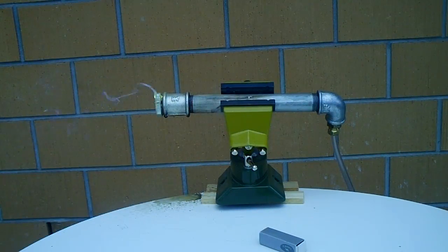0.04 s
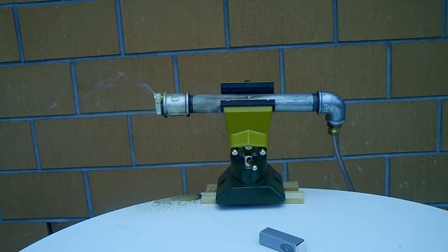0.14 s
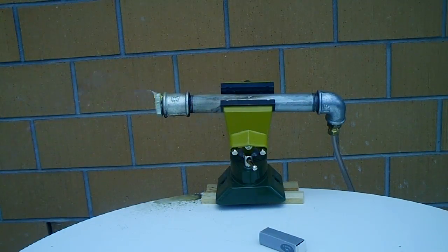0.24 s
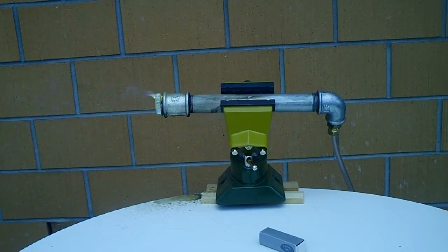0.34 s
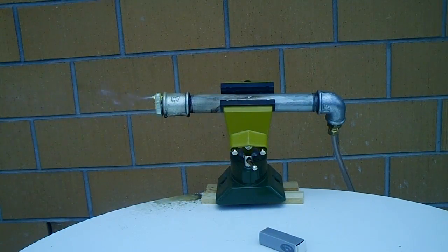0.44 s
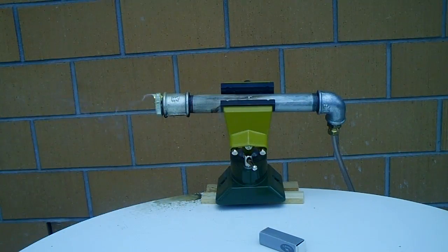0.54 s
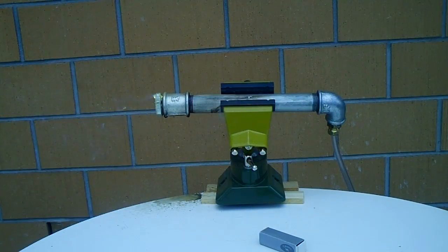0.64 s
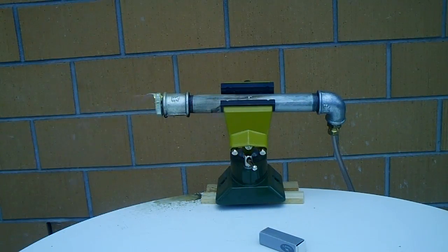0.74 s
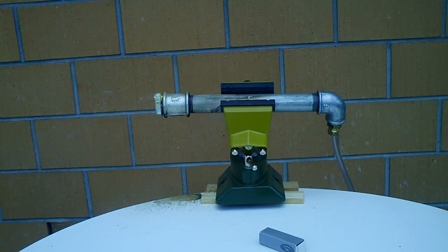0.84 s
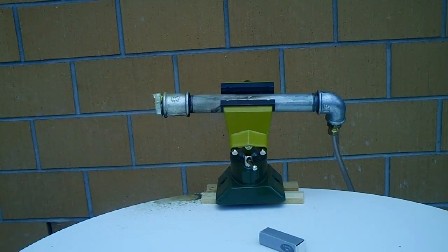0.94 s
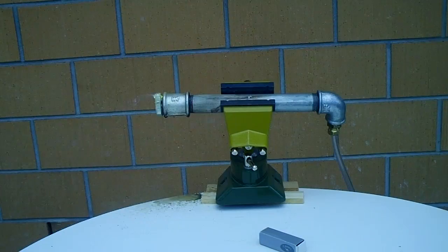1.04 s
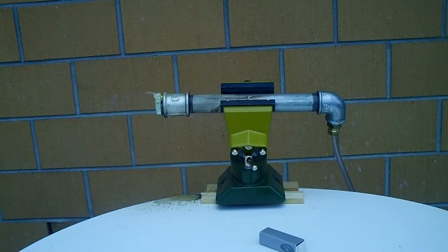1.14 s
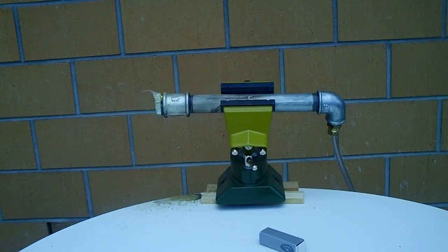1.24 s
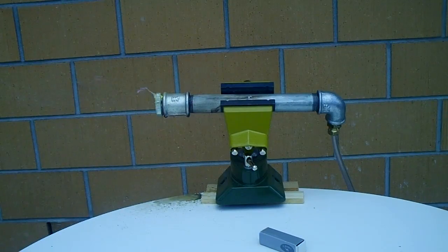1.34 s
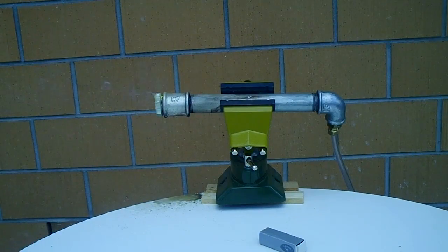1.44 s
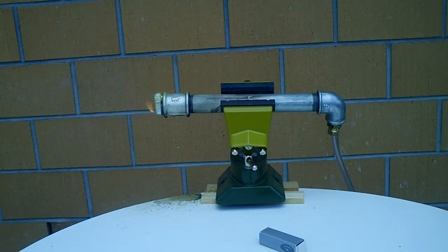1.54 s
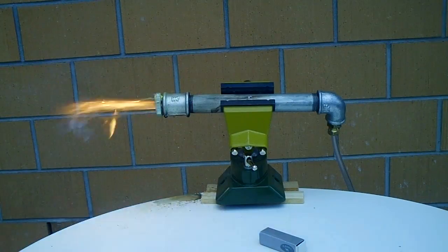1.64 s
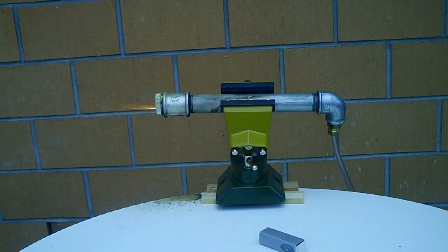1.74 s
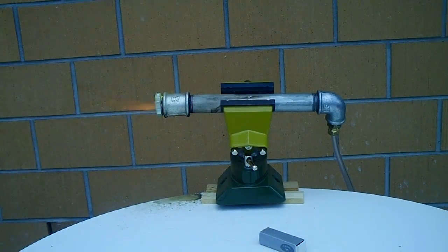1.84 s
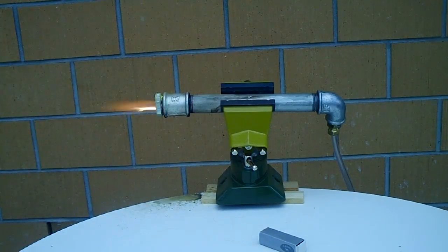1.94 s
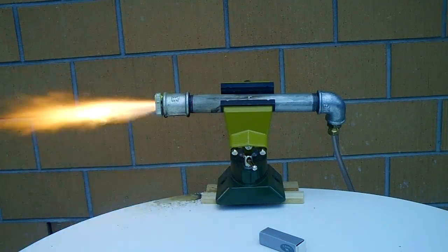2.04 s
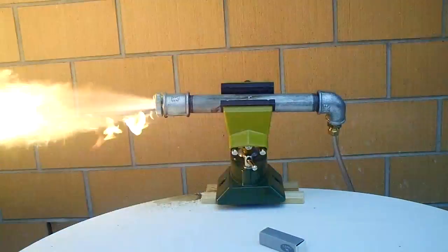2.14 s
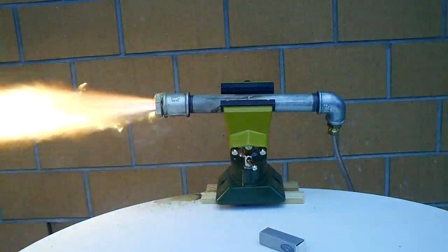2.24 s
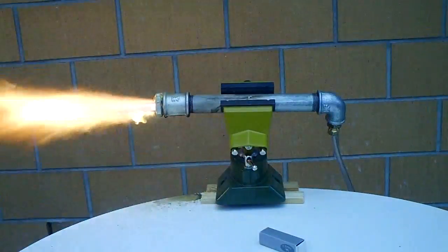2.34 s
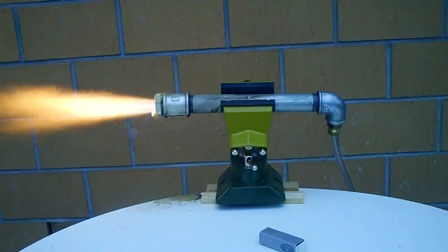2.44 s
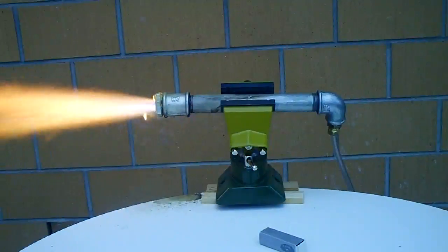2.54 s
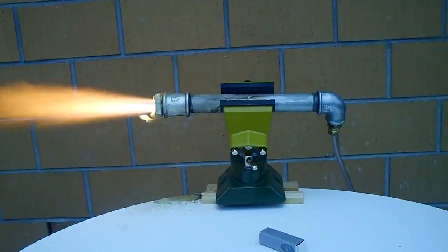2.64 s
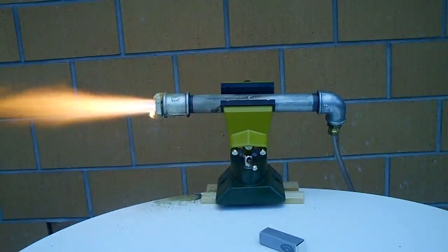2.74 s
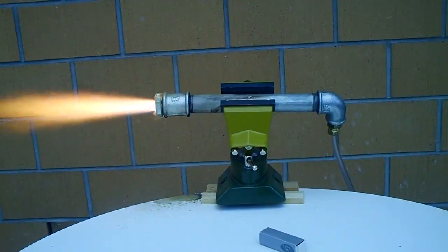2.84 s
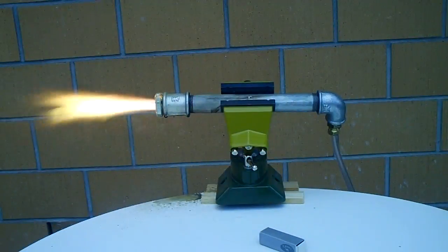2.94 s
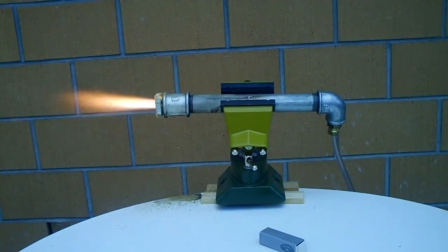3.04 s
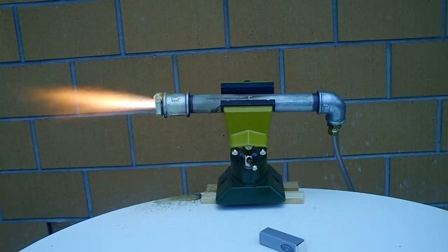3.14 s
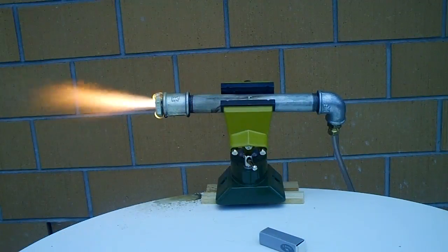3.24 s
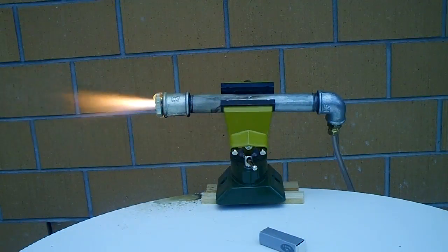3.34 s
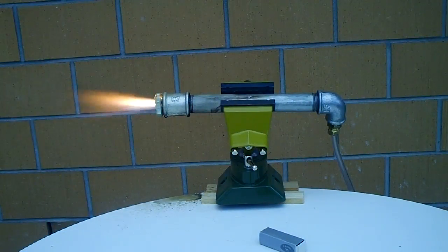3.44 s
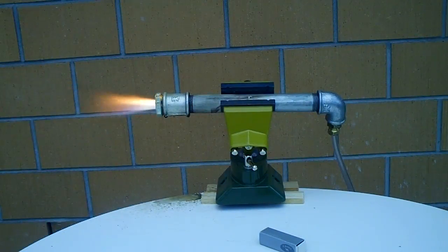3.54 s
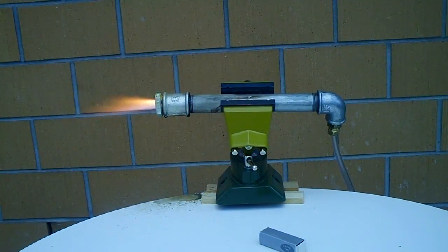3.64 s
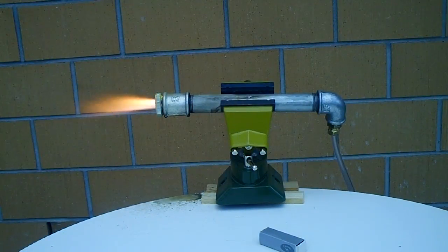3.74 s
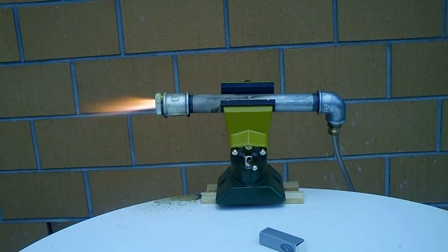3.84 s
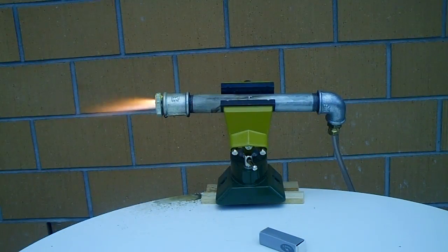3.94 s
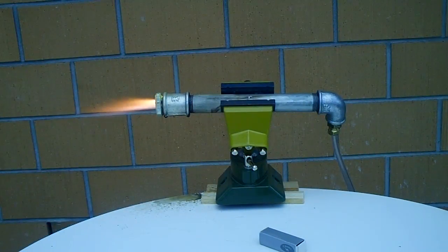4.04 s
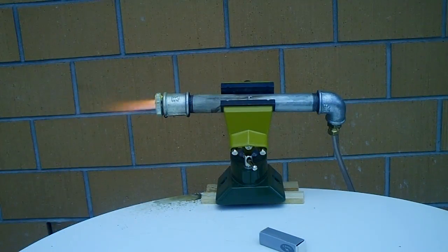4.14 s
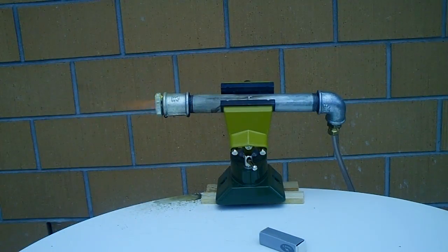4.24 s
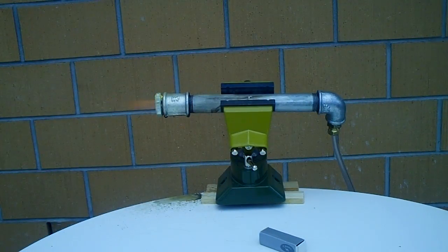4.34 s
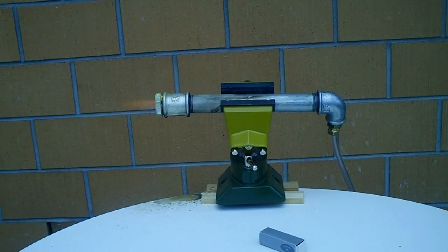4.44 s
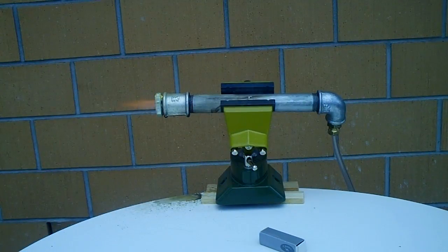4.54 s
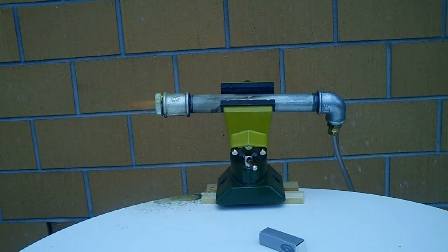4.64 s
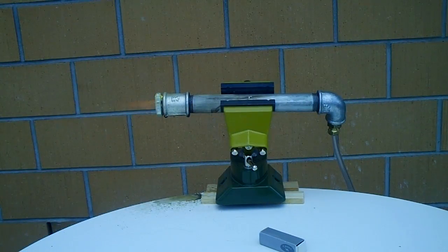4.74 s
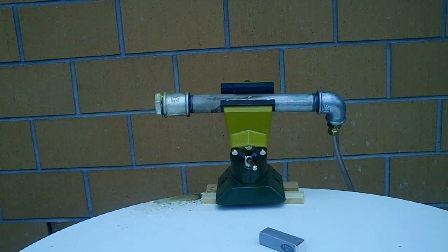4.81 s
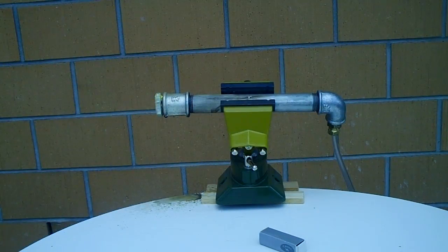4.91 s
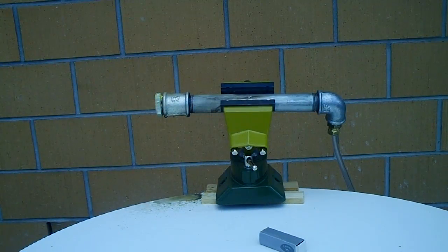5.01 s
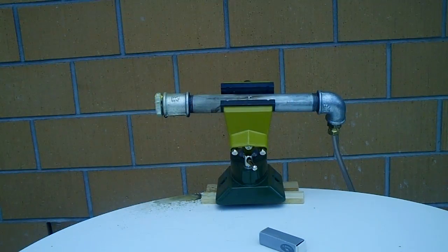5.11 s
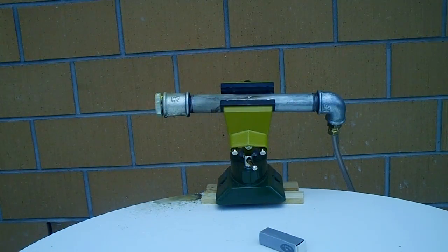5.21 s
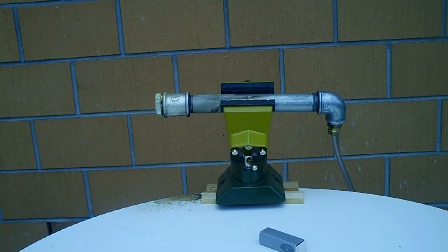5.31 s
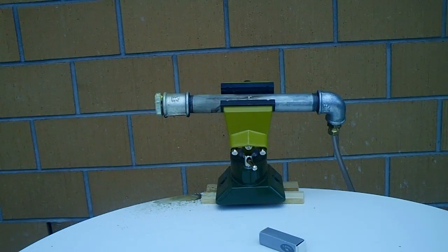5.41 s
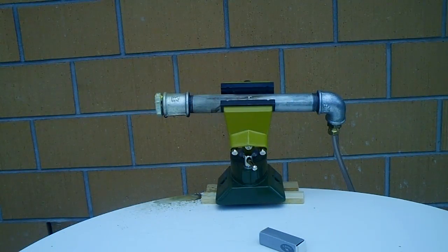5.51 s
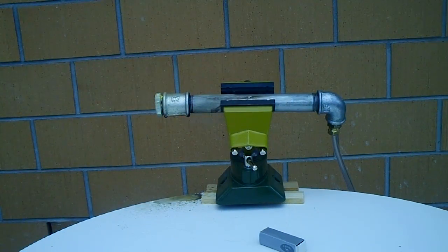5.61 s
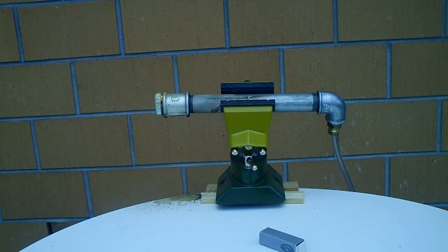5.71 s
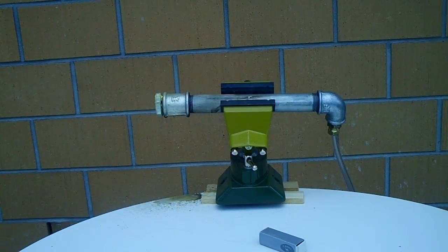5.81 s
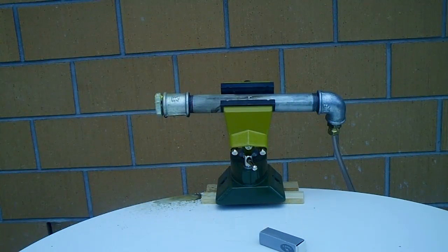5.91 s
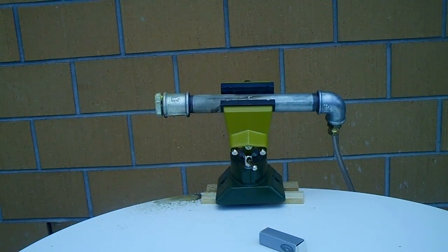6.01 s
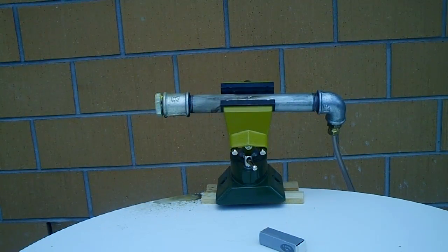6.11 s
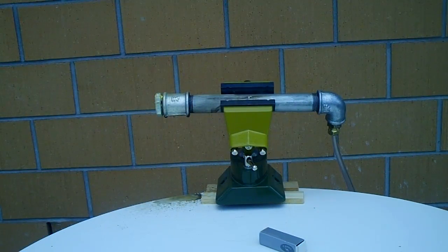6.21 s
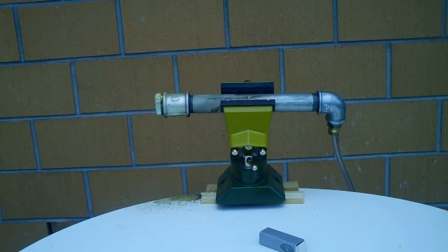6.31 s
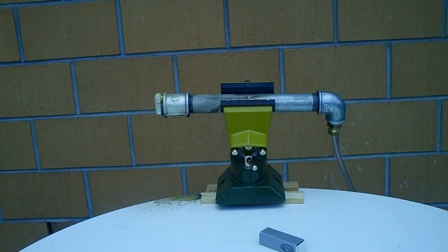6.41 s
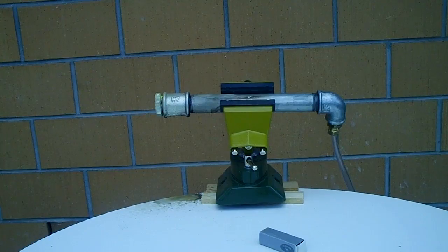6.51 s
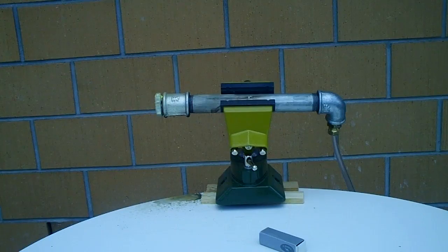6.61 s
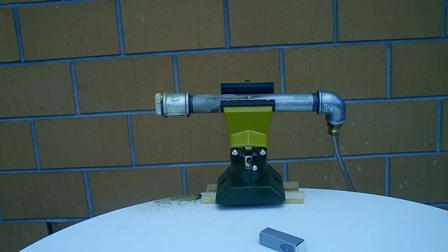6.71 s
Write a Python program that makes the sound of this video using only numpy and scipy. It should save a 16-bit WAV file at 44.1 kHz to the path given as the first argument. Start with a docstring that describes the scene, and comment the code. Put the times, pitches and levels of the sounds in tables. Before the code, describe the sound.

Outdoors beside a brick wall, a small steel pipe rocket motor lights with sharp pops after a few faint fizzes from its fuse. A loud rushing jet follows, slightly distorting the mono microphone, with a deep rumble and a howl like air blown over a bottle. The roar gives way to a brighter, chuffing hiss, sinks in pitch and ends in several hollow gasps, leaving faint far traffic and wind.

```python
"""A fuse spits faintly over distant traffic, then a small rocket motor pops alight and roars for four seconds.
Its flame rumbles and hisses, and the rushing gas makes the motor's steel pipe howl, like blowing over a
bottle, until it dies in hollow puffs. The table under it and a brick wall echo at once, and the loud jet
overloads a mono camera microphone. A little wind and the camera's own hiss lie underneath."""
import sys
import numpy as np
from scipy import signal
from scipy.fft import rfft, irfft, next_fast_len
from scipy.io import wavfile
from scipy.ndimage import uniform_filter1d, map_coordinates

SR = 44100
rng = np.random.default_rng(int(sys.argv[2]) if len(sys.argv) > 2 else 0)


def transcribe(u):
    """Save the signal u as a 16-bit wav file named by the first command-line argument.

    u: samples, shape (n,) or (channels, n), limited to [-1, 1]; the rate is SR.
    q: integer samples, one column per channel.
    """
    v = np.clip(np.atleast_2d(u).T, -1, 1)
    q = np.round(v * 32767).astype(np.int16)
    wavfile.write(sys.argv[1], SR, q)


N = 298116


def burn():
    """How the fuel burns over time: hiss level, roar level and nozzle hiss over flame hiss, all in dB."""
    # The course of the burn. Each row: time in seconds, hiss level in dB, roar above the hiss in dB.
    stages = [(1.6, -81, 3), (1.65, -71, 28), (1.7, -54.5, 15.5), (1.75, -46.5, 10), (1.8, -47, 15.5),
              (1.85, -29, 12), (1.91, -34, 12), (1.98, -25.5, 9.5), (2.03, -24.5, 9), (2.09, -9, 5),
              (2.16, -2, 5), (2.4, -3.5, 1.5), (2.6, 0, 0.5), (3.3, -1, -1.7), (3.7, -2.5, -1.5),
              (4.05, -2, -0.7), (4.25, -6, -2.5), (5.1, -9, -3.5), (5.7, -10, -6.5), (5.82, -10.5, -13),
              (6, -13, -14), (6.07, -18, -12), (6.13, -34, -6), (6.22, -46.5, -5), (6.29, -42.5, -9),
              (6.34, -51, -6), (6.39, -66, 2), (6.46, -72, 7)]
    hiss_db, above_db = curves(stages)
    shrinking_db = -19 + 6.5 * (np.arange(N) / SR - 2.15)  # the nozzle takes over as the flame shrinks
    small_flame_db = -39.5 - hiss_db  # it also leads whenever the flame is very weak
    nozzle_db = np.minimum(np.maximum(shrinking_db, small_flame_db), 3.5)
    return hiss_db, hiss_db + above_db, nozzle_db


def sputter():
    """Uneven burning, in dB: short jumps and dips, and chuffing that deepens as the flame shrinks."""
    # Single sputters. Each row: time in seconds, change of the roar in dB, half length in seconds.
    surges = [(1.672, 5, 0.011), (1.951, 4, .008), (1.961, 5, .006), (2.01, 7.5, .01), (2.058, 4, .008),
              (4.598, -10, 0.011), (4.638, 8.5, .02), (4.789, 3, .015), (4.847, -7, .012),
              (5.213, -1, 0.014), (5.331, -8, 0.011), (5.466, 1.5, .015), (5.55, -6.5, 0.045),
              (5.64, 0, .012), (5.719, 6, .012)]
    _, _, nozzle_db = burn()
    return swells(surges) + 1.57 * amp(nozzle_db) * wobble(28)


def roar(flicker, sputter_db):
    """Swirls of burning gas roar in uneven lumps."""
    # The tone of the roar. Each row: frequency in Hz, strength in dB.
    tone = [(71, -40.5), (120, -13.5), (255, -0.5), (439, -5.5), (641, 0), (756, -6), (884, 0), (1090, -11),
            (1190, -3.5), (1410, -14.5), (1700, -16.5), (2210, -42), (3740, -120)]
    _, roar_db, _ = burn()
    level_db = roar_db + sputter_db + 0.57 * flicker + 1.5 * wobble(45)
    return amp(level_db) * noise(spectrum(tone))


def hiss(flicker):
    """The jet hisses in two places: smoothly along the flame, and with a ring at the nozzle."""
    # The hiss of the long flame. Each row: frequency in Hz, strength in dB.
    plume_tone = [(820, -39), (1400, -8), (1880, -5.5), (2040, 0.5), (2360, 0.5), (2590, -6), (3020, -2),
                  (4280, -8), (5530, -3.5), (7080, -9.5), (8510, -2), (10600, -14), (12500, -29.5),
                  (16200, -55.5), (22000, -120)]
    # The hiss at the nozzle. Each row: frequency in Hz, strength in dB.
    nozzle_tone = [(820, -47.5), (1400, -16), (1480, -14.5), (1680, -9.5), (2020, -2), (2560, -13),
                   (2970, -18), (3910, -17.5), (4520, -11.5), (5580, -7), (7080, -8.5), (8910, -5.5),
                   (9760, -4.5), (10600, -6), (12500, -29), (16200, -63), (22000, -120)]
    # Narrow resonances that the nozzle hiss sets ringing. Each row: pitch in Hz, width in Hz, relative dB.
    rings = [(2960, 58, -5), (3270, 140, -6), (3620, 41, -7), (4740, 39, -4), (5650, 140, -2),
             (6350, 49, -3), (6590, 54, -8), (7120, 31, -8), (7660, 37, -5), (8630, 59, 0), (8900, 140, -2),
             (9570, 40, -7), (10300, 49, -7), (11300, 68, -17)]
    hiss_db, _, nozzle_db = burn()
    plume = noise(spectrum(plume_tone))
    nozzle = noise(lambda f: spectrum(nozzle_tone)(f) * (1 + amp(9.5) * np.abs(resonances(rings)(f))))
    share = amp(nozzle_db)
    blend = (plume + share * nozzle) / np.sqrt(1 + share ** 2)  # same power for any share
    return amp(hiss_db + 0.36 * flicker + 0.74 * wobble(30) + 0.99 * wobble(200)) * blend


def rumble():
    """The flame's deep rumble rises and falls with the roar, but less steeply."""
    # The tone of the rumble. Each row: frequency in Hz, strength in dB.
    tone = [(12, -29), (25, -7.5), (46, 7), (62, -5), (78, -6.5), (100, -4.5), (125, -15), (160, -2),
            (200, -17), (260, -35), (440, -120)]
    # Its swells and dips. Each row: time in seconds, change in dB, half length in seconds.
    buffets = [(1.69, 14, .03), (2.08, 2, .04), (2.22, -7.5, 0.16), (2.6, 5, .12), (2.83, 9.5, .1),
               (3.15, -9, .06), (4.64, 7.5, .05), (6.05, -10, .3)]
    _, roar_db, _ = burn()
    level_db = -19 + .63 * roar_db + swells(buffets) + 2.0 * wobble(8.3)
    return amp(level_db) * noise(spectrum(tone))


def pipe_howl(sputter_db):
    """The gas blows three breathy notes in the pipe; the top one gains an overtone as the jet thins."""
    # The notes sink as the pipe cools. Each row: time in seconds, low, middle and howl pitch in Hz,
    # starting point for the notes' half widths in Hz, relative levels of middle note and howl in dB.
    notes = [(1.65, 381, 1006, 2300, 60, -5, 0), (1.7, 457, 1150, 2320, 169.8, 0, 7),
             (1.745, 480.1, 1150, 2340, 169.8, 14, 1), (1.8, 497.6, 1200, 2400, 190.4, 9, 9.5),
             (1.88, 600, 1288, 2700, 499, -17, -3), (2.03, 610, 1520, 2490, 600, -6, 2.5),
             (2.15, 630.8, 1203, 2200, 500, -19, -22), (2.65, 640, 1199, 2207, 499.5, -7.5, -16),
             (3.05, 629.6, 1196, 2220, 498.7, -15, -9), (4.1, 630.5, 1232, 2282, 450.4, -11.5, -7),
             (4.5, 621.8, 1249, 2359, 330.2, -15, -7), (5.2, 583.2, 1204, 2147, 270, -12, -3),
             (5.5, 543, 1193, 2032, 200, -10, -2.5), (5.87, 481, 1090, 1910, 160, -11.5, -6),
             (6, 440, 972, 1757, 200, -13, -15.5), (6.14, 385.7, 1040, 1763, 120.5, -9, -4),
             (6.28, 372, 1160, 1907, 130, -1, -1), (6.45, 370, 1160, 1900, 100, 3, 3)]
    low_hz, mid_hz, howl_hz, spread_hz, mid_db, howl_db = curves(notes)
    hiss_db, roar_db, nozzle_db = burn()
    spread_hz = np.abs(spread_hz)  # wider when the flow is rough
    low_db = roar_db - 4 - .56 * np.maximum(roar_db + 10, 0)  # grows more slowly once the roar is loud
    low = amp(low_db + sputter_db) * breathy_note(low_hz, np.minimum(spread_hz, 190))
    middle = amp(hiss_db + mid_db) * breathy_note(mid_hz, np.minimum(spread_hz, 120))
    howl_gain = amp(hiss_db + howl_db - 2.0 + .3 * sputter_db + 1.8 * wobble(25))
    howl = howl_gain * breathy_note(howl_hz, .75 * spread_hz)
    overtone = amp(hiss_db - 23 + 2.8 * nozzle_db) * breathy_note(2.95 * howl_hz, 110)
    return low + middle + howl + overtone


def puffs():
    """Slow gas blows over the pipe's mouth; only the stronger last gasps reach its upper notes."""
    # The notes of the air in the cool pipe. Each row: pitch in Hz, width in Hz, strength in dB.
    pipe = [(370, 80, 0), (3300, 200, -29), (4740, 90, -30)]
    # Puffs before the motor lights. Each row: time in seconds, peak level in dB, half length in seconds.
    first_puffs = [(0.96, -63, .05), (1.22, -52, .04), (1.35, -50, .05), (1.438, -48, .02),
                   (1.51, -43, .04)]
    # The last gas leaving. Each row: time in seconds, peak level in dB, half length in seconds.
    last_gasps = [(6.05, -31, 0.036), (6.14, -26, .03), (6.185, -38, .02), (6.24, -27, 0.032),
                  (6.325, -27.5, 0.04), (6.41, -48.5, .03)]
    lowest, upper = resonances(pipe[:1]), resonances(pipe[1:])
    dull = noise(lambda f: lowest(f) / (1 + (f / 900) ** 2))
    hollow = noise(lambda f: lowest(f) / (1 + (f / 600) ** 4) + upper(f))
    return swells(first_puffs, amp) * dull + swells(last_gasps, amp) * hollow


def hoot():
    """The first hot gas hoots in the pipe, sliding down; a fainter, higher note comes just ahead."""
    peak_s, fall_hz_per_s = 1.62, 1100
    hz = np.clip(395 - fall_hz_per_s * (np.arange(N) / SR - peak_s), 100, 1000)
    lower = swells([(peak_s, -37, 0.031)], amp) * breathy_note(hz, 39.9)
    upper = swells([(peak_s - 0.027, -50, 0.031)], amp) * breathy_note(2.05 * hz, 30)
    return lower + upper


def pops():
    """The fuel catches in pops, each a quickly dying tone with a crack of dull noise."""
    # The pops. Each row: start in seconds, level in dB, pitch in Hz, seconds to fade by 60 dB,
    # amount of crack.
    ignition = [ (1.667, -19, 120, .06, .09), (1.7245, -17, 1160, .04, .35), (1.7245, -22, 2350, .04, .1),
                (1.812, -19, 470, .02, .3), (1.832, -13, 2400, .012, .45), (1.848, 2.5, 490, 0.023, 0.15)]
    track, t = np.zeros(N + SR), np.arange(SR // 10) / SR
    for start, db, hz, fade_s, crack in ignition:
        tone = (1 - np.exp(-t / .0006)) * np.sin(2 * np.pi * hz * t)
        snap = crack * uniform_filter1d(rng.standard_normal(len(t)), size=5)
        track[round(start * SR):][:len(t)] += amp(db - 60 * t / fade_s) * (tone + snap)
    return track[:N]


def fuse():
    """The burning fuse spits, each time a dying fizz of bright noise."""
    # The spits. Each row: start in seconds, relative level in dB, seconds to fade by 60 dB.
    spits = [(0.3827, -55, 0.06), (0.895, -53, 0.03), (1.2976, -49, 0.07)]
    t = np.arange(N) / SR
    fades = sum(amp(db - 8 - 60 * np.maximum(t - start, 0) / fade_s) * (t >= start)
                for start, db, fade_s in spits)
    return fades * noise(lambda f: resonances([(6200, 3600, 0)])(f) ** 2)


def with_echoes(sound):
    """The sound, its quick bounces off table and wall, and a short wash from walls and paving."""
    # Bounces off the table and the wall. Each row: delay in seconds, level in dB.
    bounces = [(.00169, -24), (.00252, -30.5), (.003, -23.5), (.00335, -26.5), (.00442, -34),
               (.00611, -22.5), (.00743, -23.5)]
    near = filtered(sound, lambda f: 1 + sum(amp(db) * np.exp(-2j * np.pi * f * s) for s, db in bounces))
    t, fade_s = np.arange(SR // 8) / SR, 0.067
    tail = rng.standard_normal(len(t)) * amp(-60 * t / fade_s) * (t > .004)
    wash = signal.fftconvolve(sound, tail / np.linalg.norm(tail))[:N]
    return near + amp(-10.5) * wash


def traffic():
    """Far traffic drones and slowly fades."""
    # The tone of the traffic. Each row: frequency in Hz, strength in dB.
    tone = [(12, -31.5), (20, -3.5), (43, -3.5), (64, -15), (90, -9), (138, -11), (171, -15), (194, -11.5),
            (330, -18), (391, -11), (585, -24.5), (724, -23), (1150, -18.5), (1660, -40), (3200, -51),
            (4160, -78), (7040, -120)]
    level_db = -48 - .7 * np.arange(N) / SR + 1.2 * wobble(2.8)
    return amp(level_db) * noise(spectrum(tone))


def wind():
    """Wind pushes on the microphone in soft, very low swells."""
    # The gusts. Each row: time in seconds, peak level in dB, half length in seconds.
    gusts = [(0, -40, 0.071), (0.8, -50, 0.18), (1.15, -54, .1), (1.33, -46.5, .15), (1.67, -30, 0.032),
             (6.58, -46.5, .14)]
    return swells(gusts, amp) * noise(resonances([(36.2, 6.2, 0)]))


def camera():
    """The camera's electronics add a faint hiss and thin whines."""
    # The whines. Each row: pitch in Hz, relative level in dB, how far the wave wanders in radians.
    whines = [(5840, -88.5, .1), (10207, -88.5, .3), (10120, -83.5, 1.1), (11800, -94.5, .6)]
    # The tone of the hiss. Each row: frequency in Hz, strength in dB.
    tone = [(1200, -19), (2000, -2.5), (2600, -11), (4000, -12.5), (9800, -12), (10800, -16.5),
            (12000, -23), (12600, -59.5)]
    t = np.arange(N) / SR
    whine = sum(amp(db + 6.5) * np.sin(2 * np.pi * hz * t + wander * wobble(250))
                for hz, db, wander in whines)
    return amp(-70) * noise(spectrum(tone)) + whine


def amp(db):
    """Turn decibels (dB) into a number to multiply by."""
    return 10 ** (np.asarray(db) / 20)


def unit(x):
    """Scale a sound to an average power of 1."""
    return x / np.sqrt(np.mean(x ** 2) + 1e-20)


def spectrum(points):
    """A filter shape that joins (Hz, dB) points along a logarithmic frequency scale."""
    hz, db = np.transpose(points)
    return lambda f: amp(np.interp(np.log(f + 1), np.log(hz + 1), db))


def resonances(peaks):
    """A filter shape that rings at each (pitch in Hz, width in Hz, dB) peak."""
    return lambda f: sum((-1) ** k * amp(db) * 1j * f * width / (hz * hz - f * f + 1j * f * width)
                         for k, (hz, width, db) in enumerate(peaks))


def filtered(x, shape):
    """Pass a sound through a filter shape, which gives a gain for each frequency."""
    size = next_fast_len(N + SR // 2)
    return irfft(rfft(x, size) * shape(np.fft.rfftfreq(size, 1 / SR)), size)[:N]


def noise(shape):
    """Noise of power 1, coloured by a filter shape."""
    return unit(filtered(rng.standard_normal(N), shape))


def breathy_note(hz, half_width_hz):
    """A narrow band of noise that follows the pitch hz; a wider band flutters faster."""
    phase = 2 * np.pi * np.cumsum(hz) / SR
    clock = np.cumsum(2 * half_width_hz * np.ones(N)) / SR
    flutter = [unit(map_coordinates(rng.standard_normal(9000), [clock % 8990])) for _ in range(2)]
    return flutter[0] * np.cos(phase) + flutter[1] * np.sin(phase)


def curves(rows):
    """Join rows that start with a time into one curve per column; -120 (silence in dB) outside them."""
    times, *columns = np.transpose(rows)
    return [np.interp(np.arange(N) / SR, times, column, -120, -120) for column in columns]


def wobble(rate):
    """A smooth curve through rate random values a second."""
    return map_coordinates(rng.standard_normal(int(N * rate / SR) + 4), [np.arange(N) * rate / SR])


def swells(rows, scale=np.asarray):
    """Add up smooth bumps, one per (time, size, half length) row; scale=amp turns dB sizes into gains."""
    steps = np.arange(0, N, 32)
    bumps = sum(scale(size) * np.exp(-((steps / SR - s) / half) ** 2) for s, size, half in rows)
    return np.interp(np.arange(N), steps, bumps)


def scene():
    """The motor and its echoes, over traffic, wind and camera hiss."""
    sputter_db = sputter()
    flicker = wobble(9)  # uneven burning, shared by roar and hiss
    flame = roar(flicker, sputter_db) + hiss(flicker) + rumble()
    motor = flame + pipe_howl(sputter_db) + puffs() + hoot() + pops() + fuse()
    return np.tile(with_echoes(motor) + traffic() + wind() + camera(), (2, 1))


def record(dry):
    """The mono microphone misses the highest treble, loud peaks are flattened, the converter dulls them."""
    # Treble loss in the digital converter, after the overload. Each row: frequency in Hz, gain in dB.
    converter = [(9000, -1), (11000, -2.5), (12200, -9.5), (15600, -10)]
    mic_top_hz, converter_top_hz = 12400, 15650
    ceiling, hardness = .72, 9
    heard = filtered(dry[0], lambda f: 1 / (1 + (f / mic_top_hz) ** 40))
    clipped = heard / (1 + np.abs(heard / ceiling) ** hardness) ** (1 / hardness)
    dulled = filtered(clipped, lambda f: spectrum(converter)(f) / (1 + (f / converter_top_hz) ** 400))
    return np.tile(dulled, (2, 1))


dry = scene()
out = record(dry)
transcribe(out)
```